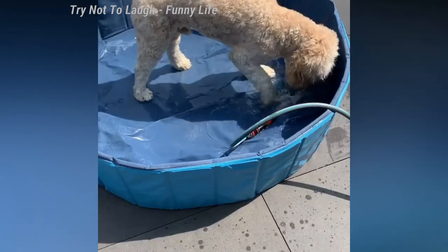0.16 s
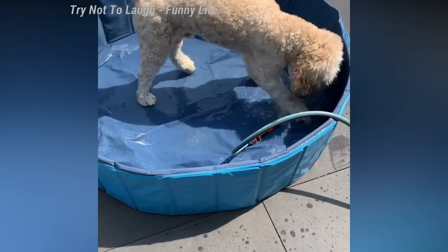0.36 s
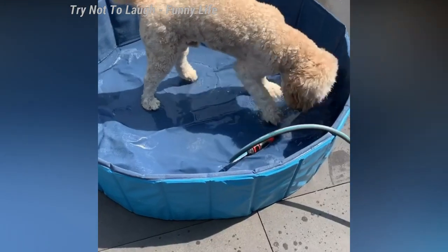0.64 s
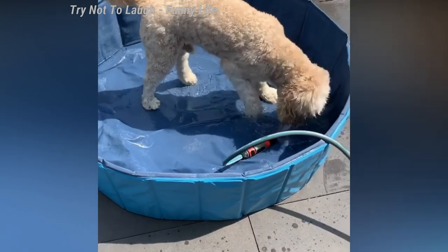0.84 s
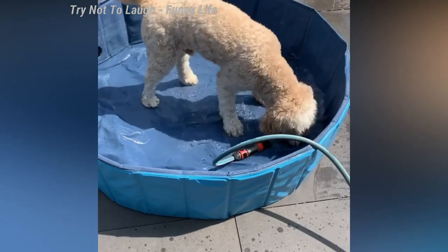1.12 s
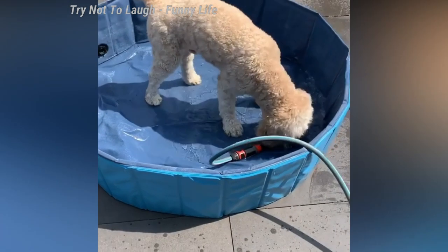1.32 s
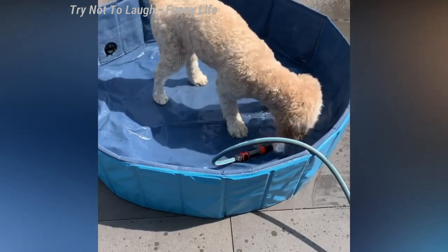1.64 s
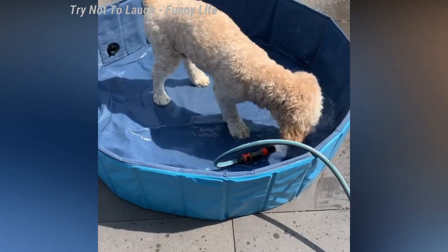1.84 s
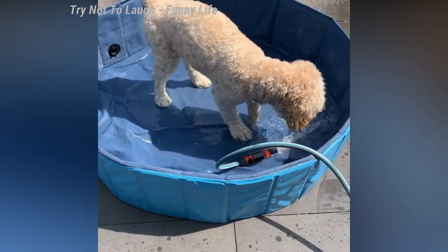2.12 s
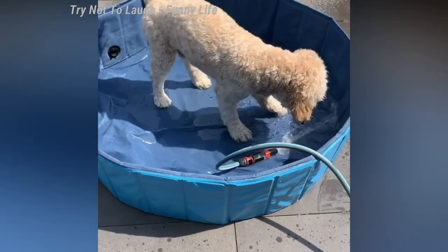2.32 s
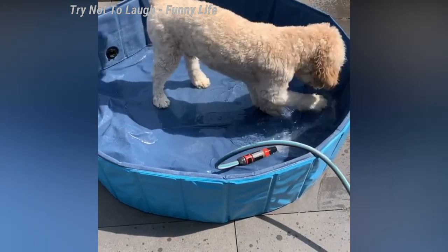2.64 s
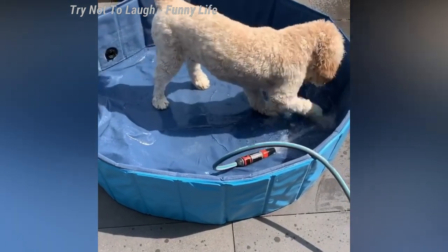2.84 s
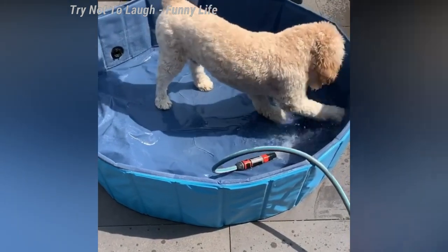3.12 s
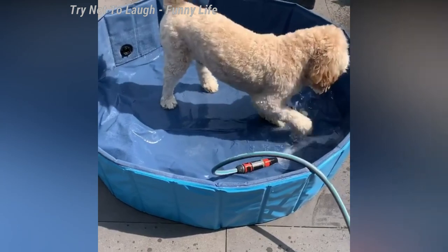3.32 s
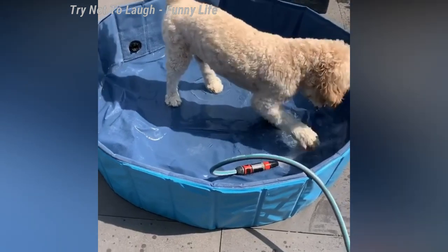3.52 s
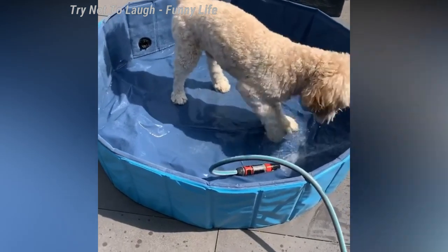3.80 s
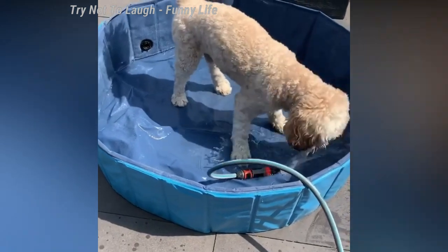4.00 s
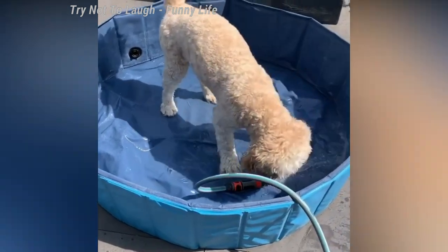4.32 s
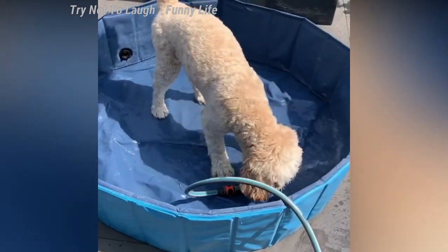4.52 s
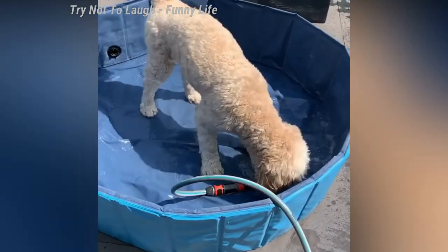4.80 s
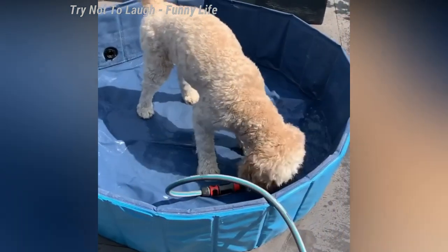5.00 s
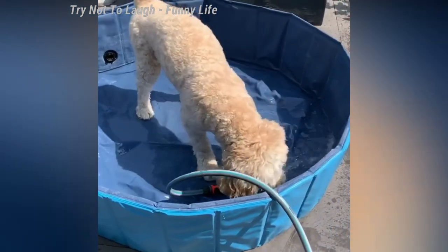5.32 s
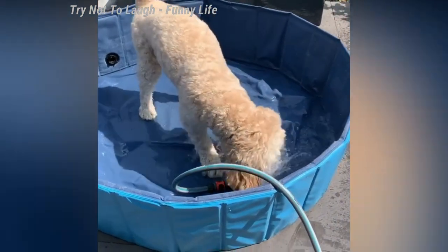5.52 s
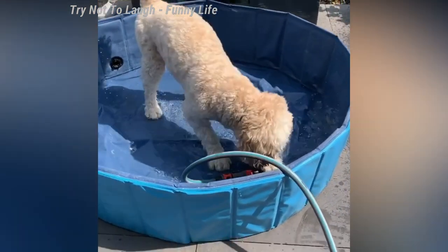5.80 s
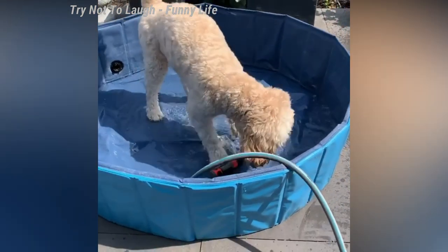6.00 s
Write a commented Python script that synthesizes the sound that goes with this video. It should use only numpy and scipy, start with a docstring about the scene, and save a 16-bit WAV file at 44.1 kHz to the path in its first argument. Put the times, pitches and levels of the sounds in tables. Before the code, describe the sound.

From 0 to 0.1 s there is a faint, centred rush of noise, then a tiny silence. At 0.15 s the pool cuts in: a steady, uneven hiss from a hose, soft trickling underneath and a very low outdoor hum. Quick paw splashes come at 0.2, 0.45-0.6 and 0.8 s, with gulps and spray. Mostly hose until a soft deep thump near 1.9 s and two wet, plopping slaps at 2.0-2.1 s. Light drops tick around 2.4 and 2.8 s. A strong splash lands at 2.9 s, then a dense splattering cluster at 3.15-3.4 s and a smaller one at 3.7 s. The hose continues alone, slightly quieter, with a small gurgle at 4.8 s and a dull thump at 5 s. Loud slaps and round bubble plops hit at 5.4-5.55 s and again at 5.8-5.95 s. Close, dry stereo, splashes slightly right.

```python
"""A short rush and a moment of silence, then a garden hose hisses and trickles into a plastic pool.
Outdoors, over a low hum, a dog paws and noses at the shallow water, a little right of the hose.
Each stroke is a swelling and collapsing mix of gulping bubbles, splatter and fine spray.
Paw slaps are cracks of noise with short rings; plops are single bubbles with sliding pitch.
Short dull thumps and long faint low hums are sagging tones, and flung drops land as bright ticks."""
import sys
import numpy as np
from scipy import signal
from scipy.fft import rfft, irfft, next_fast_len
from scipy.io import wavfile
from scipy.ndimage import uniform_filter1d, map_coordinates

SR = 44100
rng = np.random.default_rng(int(sys.argv[2]) if len(sys.argv) > 2 else 0)


def generate_wav(sig):
    """Save sig (samples, or channels by samples) to the path in sys.argv[1] as 16-bit PCM at SR."""
    pcm = np.round(np.clip(np.atleast_2d(sig).T, -1, 1) * 32767).astype(np.int16)
    wavfile.write(sys.argv[1], SR, pcm)


N = 271215  # length of the sound in samples


def amp(db):
    """Turn decibels into a gain."""
    return 10 ** (np.asarray(db) / 20)


def unit(x):
    """Scale x to an rms (average strength) of 1."""
    return x / np.sqrt(np.mean(x ** 2) + 1e-20)


def along(points, hz):
    """Read a curve of (pitch_hz, value) points, joined by straight lines on a log pitch axis."""
    point_hz, values = np.transpose(points)
    return np.interp(np.log(hz + 1), np.log(point_hz + 1), values)


def wobble(rate):
    """Make a smooth random curve with rate random points a second."""
    points = rng.standard_normal(int(N * rate / SR) + 4)
    return map_coordinates(points, [np.arange(N) * rate / SR])


def filtered(x, response):
    """Filter x by a gain, possibly with a phase turn, that depends on frequency."""
    size = next_fast_len(N + SR // 2)
    return irfft(rfft(x, size) * response(np.fft.rfftfreq(size, 1 / SR)), size)[..., :N]


def add(track, start_s, sound):
    """Mix a sound into a track from start_s on."""
    part = track[..., max(round(start_s * SR), 0):][..., :sound.shape[-1]]
    part += sound[..., :part.shape[-1]]


# how alike left and right are: pitch_hz, likeness (1 = the same, 0 = unrelated)
LIKENESS = [(60, 1), (300, 0.9), (550, 1), (850, 0.32), (1300, 0.7), (1900, 0.8), (4500, 0.92),
            (5600, 0.35), (13000, 0.43)]


def spread(pair, spectrum):
    """Colour two unrelated signals and blend them into a partly alike stereo pair of rms 1."""
    def middle_and_side_gains(hz):
        angle = np.arccos(np.clip(along(LIKENESS, hz), -1, 1)) / 2
        return amp(along(spectrum, hz)) * [np.cos(angle), np.sin(angle)]

    middle, side = filtered(pair, middle_and_side_gains)
    return unit(np.array([middle + side, middle - side]))


def bubble(t, hz, t60, glide):
    """A damped ring with a soft start; glide lets its pitch drift as the bubble nears the surface."""
    age = np.minimum(t / t60, 1)
    ring = np.sin(2 * np.pi * hz * t * (1 + glide * age / 2))
    soft_start = 1 - np.exp(-2 * hz * t)
    return ring * amp(-60 * t / t60) * soft_start


def froth(spectrum, rate, low_hz, high_hz, cycles, scatter_db, foam):
    """Bubbles of random pitch and size, rate a second on each side, plus a share of smooth foam noise."""
    pair = []
    t = np.arange(int(min(cycles / low_hz, .04) * SR)) / SR
    for side_rng in rng.spawn(2):
        when, pitch, size = side_rng.random((int(rate * N / SR), 3)).T[:, :, None]
        hz = low_hz + (high_hz - low_hz) * pitch
        # above zero, scatter_db makes a few bubbles stand out; below zero, it makes a few faint
        strength = amp(-scatter_db * np.log(1 - .99 * size))
        strength = strength * np.sqrt(hz)  # high bubbles die sooner and so start stronger
        rings = strength * bubble(t, hz, cycles / hz, glide=0.2)
        slots = (when * N).astype(int) + np.arange(len(t))
        pair.append(unit(np.bincount(slots.ravel(), rings.ravel(), N)[:N]))
    return spread(np.array(pair) + foam * rng.standard_normal((2, N)), spectrum)


# colour of the opening rush: pitch_hz, gain_db
RUSH_COLOUR = [(250, -1), (800, -6.5), (9500, -5), (12500, -13)]


def rush(level_db=-33):
    """Noise shaped by a filter makes a rush, the same on both sides."""
    noise = rng.standard_normal(N)
    return amp(level_db) * unit(filtered(noise, lambda hz: amp(along(RUSH_COLOUR, hz))))


def patchy(x, depth_db):
    """Each part of the spectrum flickers at random on its own, which makes the hiss uneven."""
    cells = signal.stft(x, nperseg=256)[2]
    field = uniform_filter1d(rng.standard_normal(cells.shape[1:]), size=4, axis=0)  # smooth over pitch
    field = uniform_filter1d(field, size=10, axis=1)  # smooth over time
    return unit(signal.istft(cells * amp(depth_db * unit(field)), nperseg=256)[1][:, :N])


# how the hiss of the running hose rises and falls: time_s, relative_level_db
HOSE_LEVELS = [(0.15, -42), (0.99, -42.5), (1.38, -50), (1.79, -44), (3.17, -42.5), (4.09, -44.5),
               (4.63, -47), (4.83, -46), (5.15, -49), (5.38, -46.5), (6.15, -44.5)]
# colour of the hiss, also used for flung drops: pitch_hz, gain_db
HISS_COLOUR = [(2500, 1), (3400, -1), (4700, -0.5), (5500, -2.5), (8500, 0.5), (10200, 0.5), (12300, -2.5)]
# colour of the trickle: pitch_hz, gain_db
TRICKLE_COLOUR = [(30, -38), (100, -15), (180, 0), (350, -5.5), (520, 3.5), (650, -3.5), (850, -2.5),
                  (1020, -8.5), (1250, -4.5), (1600, -10), (2150, -7.5), (4500, -11), (8000, -88)]


def hose(hiss_db=4, trickle_db=-45.0, gurgle_db=-48, gurgle_s=4.83, gurgle_width_s=0.07):
    """The jet fizzes unevenly and keeps small bubbles trickling; it gurgles as the muzzle nudges it."""
    t = np.arange(N) / SR
    sputter_db, lapping_db = .8 * wobble(25), .6 * wobble(4)
    fizz = froth(HISS_COLOUR, rate=2600, low_hz=2624, high_hz=12930, cycles=197, scatter_db=1.0, foam=0.97)
    trickle = froth(TRICKLE_COLOUR, rate=1300, low_hz=385.0, high_hz=2833, cycles=58.5,
                    scatter_db=1.0, foam=0.97)
    gurgle = spread(rng.standard_normal((2, N)), [(1600, -32), (2000, 1), (2400, -37)])
    jet_db = np.interp(t, *np.transpose(HOSE_LEVELS)) + hiss_db + sputter_db
    gurgle_shape = np.exp(-((t - gurgle_s) / gurgle_width_s) ** 2)
    return (patchy(fizz, depth_db=1.1) * amp(jet_db)
            + trickle * amp(trickle_db + lapping_db)
            + gurgle * amp(gurgle_db) * gurgle_shape)


# colour of the outdoor hum: pitch_hz, gain_db
HUM_COLOUR = [(20, -47), (40, -36), (52, -11.5), (61, 0.5), (75, -22), (95, -7.5), (140, -22), (300, -21.5),
              (900, -53)]


def hum(level_db=-54.0):
    """Noise kept mostly to low pitches makes an outdoor hum whose level wavers."""
    return amp(level_db + 4.7 * wobble(7.2)) * spread(rng.standard_normal((2, N)), HUM_COLOUR)


# short dull thumps and long faint low hums: start_s, peak_db, middle_pitch_hz, length_s
LOW_TONES = [(0.156, -49, 98, 0.8), (1.882, -28.5, 67.5, 0.066), (1.962, -32.5, 63, 0.045),
             (2.69, -53, 89.7, 0.95), (4.988, -37, 64, 0.076)]


def low_tones(sag=0.089):
    """Soft, deep tones swell and fade while their pitch sags by a share of itself."""
    out = np.zeros(N)
    for start_s, peak_db, hz, length_s in LOW_TONES:
        t = np.arange(int(length_s * SR)) / SR
        swell = np.sin(np.pi * t / length_s)
        tone = np.sin(2 * np.pi * hz * t * (1 + sag * (1 - t / length_s) / 2))
        add(out, start_s, amp(peak_db) * swell * tone)
    return out


def stroke_shape(t, build_s):
    """The paw breaks the surface, the splash swells to its crest at t = 0, collapses and settles."""
    entry = np.clip((t + build_s) / 0.0073, 0, 1)  # breaking the surface takes 7.3 ms
    swell = amp(2.5 * np.minimum(t, 0) / build_s)  # grows by 2.5 dB up to the crest
    after = np.maximum(t, 0)
    collapse = amp(-60 * after / 0.14)
    settling = amp(-16 - 60 * after / 0.36)  # the water falls back more quietly and slowly
    return entry * swell * np.hypot(collapse, settling)


def tilted(x, slope_db):
    """Make x brighter or duller through the midrange by slope_db an octave."""
    octaves = np.log2(np.clip(np.fft.rfftfreq(x.shape[-1], 1 / SR), 700, 3500) / 1500)
    return irfft(rfft(x) * amp(slope_db * octaves), x.shape[-1])


# rings of the water pocket under a paw: typical_pitch_hz, relative_level_db, t60_s (time to fall 60 dB)
POCKET_RINGS = [(429, 0.5, 0.03), (555, -0.5, 0.08), (783, 5.5, 0.014), (1177, -8.5, 0.076),
                (1490, -4.5, 0.035), (1914, -10, 0.0094), (3490, -17, 0.01)]


def pocket(t, bright_db):
    """The short ring of the pocket that a hit pushes into the water, a little different each time."""
    rings = 0
    for k, (hz, level_db, t60) in enumerate(POCKET_RINGS):
        tilt_db = bright_db * np.log2(hz / POCKET_RINGS[2][0])
        strength = amp(level_db + tilt_db + rng.normal(0, 0.73, (2, 1)))
        ring = bubble(t, hz * rng.normal(1, 0.055), t60, glide=0)
        rings = rings + (-1) ** k * strength * ring
    return rings


def patter(bright_db=7, blob_t60=0.019):
    """Blobs of thrown water land in quick, uneven succession; each knocks a pocket of its own size."""
    rate, scatter_db, pitch_octaves = 230, 3, .25
    t = np.arange(SR // 60) / SR
    knock = pocket(t, bright_db)[0] * amp(-60 * t / blob_t60)
    gap, size, pitch = rng.standard_normal((int(rate * N / SR), 3)).T[:, :, None]
    landing_s = np.cumsum(np.exp(.5 * gap), axis=0) / rate
    slots = (landing_s * SR).astype(int) + np.arange(len(t))
    # reading the knock faster or slower changes its pitch
    knocks = amp(scatter_db * size) * np.interp(t * 2 ** (pitch_octaves * pitch), t, knock)
    return unit(np.bincount(slots.ravel(), knocks.ravel(), N)[:N])


# paw and muzzle strokes: crest_s, build_up_s, splatter_level_db, gulp_over_splatter_db,
# splatter_brightness_db_per_octave, spray_over_splatter_db
STROKES = [(.201, 0.033, -30, -0.5, -0.5, -6), (.447, 0.012, -35.5, 5, -2, -7),
           (.519, 0.031, -30.5, -2, 7, -7), (.549, 0.027, -37, -4, 7, -5), (0.574, 0.032, -44, 4.5, 7, -2),
           (.8, .03, -42.5, 1.5, 2, 0), (0.83, 0.024, -35.5, -8, 5, -22), (1.993, 0.02, -35, 1.5, 1.5, -8),
           (2.095, 0.015, -33.5, 5.5, 1, -3), (2.884, 0.029, -26, -1.5, 1, -8),
           (3.153, 0.032, -28, -12, -4.5, -19), (3.22, 0.05, -34, -15, 1, -6),
           (3.276, 0.023, -27.5, -23, 2, -12), (3.312, 0.032, -29.5, -10.5, -6, -5.5),
           (3.392, 0.063, -38.5, -1.5, 5, -10), (3.683, 0.033, -38, 2, -2, -9),
           (3.738, .012, -42, 3, 12, -7), (5.404, 0.022, -38.5, 5, -5, -5.5),
           (5.462, 0.037, -31.5, 1.5, -2, -8.5), (5.52, .029, -24, -18, -3.5, -5.5),
           (5.547, 0.021, -33, 0.5, 6, -2.5), (5.828, 0.028, -31.5, 6, -4.5, -9.5),
           (5.903, 0.035, -30, 3.5, -6.5, -17), (5.937, 0.023, -28, -4, 5, -6)]
# colours of the big bubbles, small bubbles and fine drops: pitch_hz, gain_db
GULP_COLOUR = [(60, -54), (140, -6.5), (250, -15), (350, -4.5), (440, -6), (540, 0), (680, -10.5),
               (900, -4), (1150, -56), (2000, -70)]
SPLATTER_COLOUR = [(850, -37), (1030, 5), (1250, -2), (1530, 3), (1750, -1), (1950, -2), (2400, -5.5),
                   (2900, 4.5), (5000, -57)]
SPRAY_COLOUR = [(2400, -55), (2900, 13.5), (3600, 6), (4500, 1.5), (6500, 1), (10500, -6.5), (13000, -17)]


def strokes(patter_db=-2, clump_db=1, clumps_per_s=120):
    """Strokes swell and collapse; big bubbles gulp, small ones splatter among blobs, fine drops spray."""
    gulp = froth(GULP_COLOUR, rate=400, low_hz=185.0, high_hz=1090, cycles=9.7, scatter_db=-0.5, foam=0.1)
    splatter = froth(SPLATTER_COLOUR, rate=500, low_hz=891, high_hz=2554, cycles=21.0,
                     scatter_db=2.5, foam=0.25)
    spray = froth(SPRAY_COLOUR, rate=2000, low_hz=2500, high_hz=13080, cycles=99, scatter_db=0, foam=0.84)
    splatter = splatter + amp(patter_db) * patter()
    # the thrown water lands in uneven clumps
    waters = [water * amp(clump_db * wobble(clumps_per_s)) for water in (gulp, splatter, spray)]
    out = np.zeros((2, N))
    for crest_s, build_s, level_db, gulp_db, bright_db, spray_db in STROKES:
        first = round((crest_s - build_s) * SR)
        t = np.arange(first, min(first + SR // 3, N)) / SR
        shape = stroke_shape(t - crest_s, build_s)
        shape_rms = np.sqrt(np.mean(shape ** 2))
        for water, over_db, slope_db in zip(waters, [gulp_db, 0, spray_db], [0, bright_db, 0]):
            splash = unit(tilted(water[:, first:first + len(t)], slope_db) * shape) * shape_rms
            add(out, crest_s - build_s, amp(level_db + over_db) * splash)
    return out


# paw slaps: start_s, relative_peak_db, brightness_db_per_octave
SLAPS = [(.179, -18, -2), (.484, -13, 10), (.755, -25, 3), (2.042, -7, 2.5), (2.092, -4.5, 2),
         (2.853, -17, 11), (2.865, -11.5, 1), (3.127, -17, 5), (3.142, -18, 4.5), (3.159, -21, 3),
         (3.224, -17, 10), (3.268, -10.5, 8.5), (3.274, -9, 7), (3.292, -9.5, 10), (3.725, -13.5, -1),
         (5.455, -12, -5), (5.499, -6, 4), (5.519, -7, 0.5), (5.807, -18, -1), (5.934, -1.5, 3)]


def slaps(level_db=-5.5, crack=0.21, crack_t60=0.025):
    """A paw hits the water: a wet crack and a short pocket ring; a flat, shallow hit rings brighter."""
    out, t = np.zeros((2, N)), np.arange(SR // 12) / SR
    for start_s, peak_db, bright_db in SLAPS:
        crack_noise = crack * rng.standard_normal((2, len(t))) * amp(-60 * t / crack_t60)
        hit = pocket(t, bright_db) + crack_noise
        add(out, start_s, amp(peak_db + level_db) * hit / np.abs(hit).max())
    return out


# the largest single bubbles: crest_s, peak_db, pitch_at_crest_hz, slide_after_crest_octaves, swell_s
PLOPS = [(.194, -20.5, 618, 0.11, .0084), (0.4456, -19.5, 660, -0.19, 0.0034),
         (.508, -21.5, 1523, 0.0053, .012), (.543, -25.5, 1570, 0.0083, 0.0063),
         (.543, -28, 2280, 0, 0.011), (.545, -20.5, 787, -0.19, 0.0093),
         (.578, -20.5, 633, -0.065, 0.00493), (.825, -27.5, 1847, -0.079, .007),
         (2.045, -17.5, 527, 0.15, .003), (2.095, -18, 515, -0.099, .004), (2.866, -25.5, 340, .2, 0.0037),
         (2.876, -18.5, 490, 0.18, .008), (2.877, -19, 1490, 0.077, .003),
         (2.883, -24, 1825, -0.096, 0.0039), (3.153, -22.5, 1040, 0.051, .011),
         (3.275, -21, 660, 0.15, 0.0036), (3.626, -27.5, 490, -0.028, .0033),
         (3.729, -23, 525, -0.031, .0029), (5.4, -26.5, 492, -.3, 0.00704),
         (5.4895, -12.5, 546, 0.36, 0.0037), (5.507, -17, 1053, -0.03, .004),
         (5.52, -19.5, 1000, 0.48, .003), (5.554, -23, 244, -0.44, 0.0045),
         (5.81, -23.5, 296, 0.31, 0.0037), (5.826, -21, 586, .13, 0.0044), (5.911, -19, 596, 0.063, 0.0031),
         (5.925, -12, 552, -0.0034, .005), (5.938, -17, 480, -0.31, 0.0019)]


def plops(waver=0.027):
    """Large pockets of trapped air swell and ring; pitch slides as a pocket opens or is squeezed."""
    out, t = np.zeros(N), np.arange(SR // 12) / SR
    unsteady = 1 + waver * wobble(200)
    for crest_s, peak_db, hz, slide, swell_s in PLOPS:
        age = t / swell_s
        pitch = hz * 2 ** (slide * np.tanh(age - 1)) * unsteady[round(crest_s * SR):][:len(t)]
        swell_and_fade = (age * np.exp(1 - age)) ** 2
        tone = np.sin(2 * np.pi * np.cumsum(pitch) / SR)
        add(out, crest_s - swell_s, amp(peak_db) * swell_and_fade * tone)
    return out


# flung drops landing: start_s, relative_level_db
SPRINKLES = [(.441, -36), (0.755, -38.5), (1.947, -34), (2.378, -34), (2.793, -33), (3.197, -34),
             (3.273, -30), (3.617, -32.5), (5.934, -33)]


def sprinkles():
    """A handful of drops lands at once with a bright tick, a short burst of tiny bubbles and noise."""
    gain, t = np.zeros(N), np.arange(SR // 8) / SR
    tick = amp(-60 * t / .06) * (1 - np.exp(-t / .002))
    for start_s, level_db in SPRINKLES:
        add(gain, start_s, amp(level_db) * tick)
    drops = froth(HISS_COLOUR, rate=3200, low_hz=2250, high_hz=12300, cycles=2.2, scatter_db=-4.5, foam=1.0)
    return 3.1 * gain * drops


# near echoes off the pool wall: delay_s, level_db
ECHOES = [(.004, -24), (.0079, -19), (0.011, -11)]


def echoed(x):
    """Near echoes of the pool wall comb the sound: delayed copies strengthen or weaken each pitch."""
    def response(hz):
        return 1 + sum(amp(db) * np.exp(-2j * np.pi * hz * delay_s) for delay_s, db in ECHOES)

    return filtered(x, response)


def walls(x, t60=0.043, level_db=-17):
    """The pool wall and the paving return a short, weak scatter."""
    t = np.arange(SR // 4) / SR
    tail = rng.standard_normal((2, len(t))) * amp(-60 * t / t60) * (t > .003)
    tail = tail / np.linalg.norm(tail[0])
    return x + amp(level_db) * signal.fftconvolve(x, tail, axes=1)[:, :N]


def scene(right_db=1):
    """The dog works a little to the right of the hose."""
    water_and_hum = echoed(hose() + sprinkles()) + low_tones() + hum()
    dog = walls(echoed(strokes()) + slaps() + plops())
    return water_and_hum + dog * amp([[-right_db], [right_db]])


# left-right phase of the stereo sound: pitch_hz, left_lead_radians
LEFT_LEAD = [(150, 0), (750, -1.3), (1400, 0), (2100, 0), (3300, -4.9), (3900, -4.4), (4350, -3.1),
             (5200, -3), (6350, 0), (7400, 0), (8350, 3.1), (9550, 3.1), (10400, 6.3), (11600, 6.3),
             (12500, 9.4)]


def record(dry, rush_end_s=0.104, pool_start_s=0.149, top_hz=13050):
    """The two sides differ in phase; a short centred rush and silence come before the pool."""
    t = np.arange(N) / SR
    sides = np.array([[1], [-1]])
    pool = filtered(dry, lambda hz: np.exp(.5j * along(LEFT_LEAD, hz) * sides))
    joined = rush() * (t < rush_end_s) + pool * (t > pool_start_s)
    # a steep filter removes what lies above top_hz
    return filtered(joined, lambda hz: 1 / np.sqrt(1 + (hz / top_hz) ** 160))


dry = scene()
out = record(dry)
generate_wav(out)
```